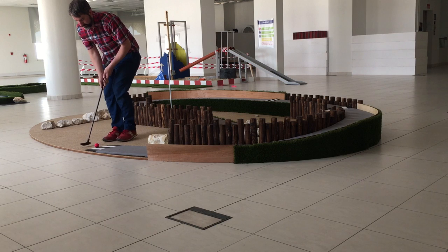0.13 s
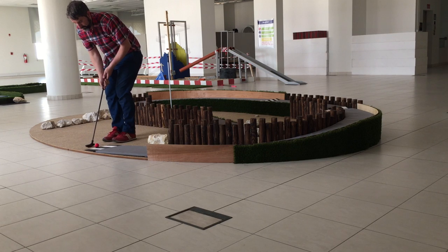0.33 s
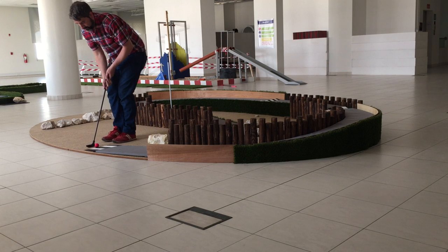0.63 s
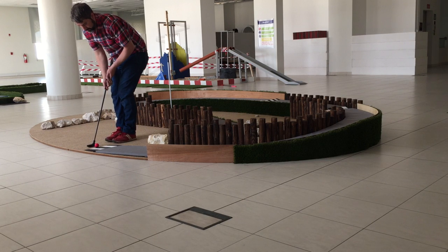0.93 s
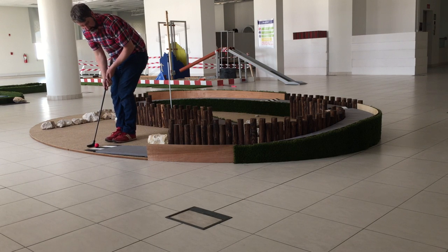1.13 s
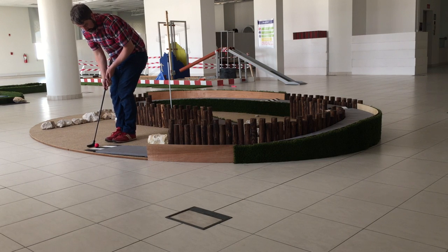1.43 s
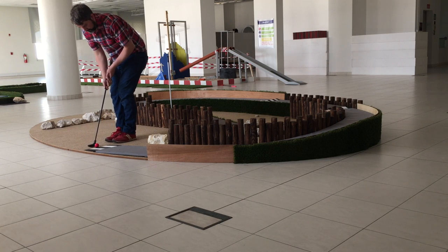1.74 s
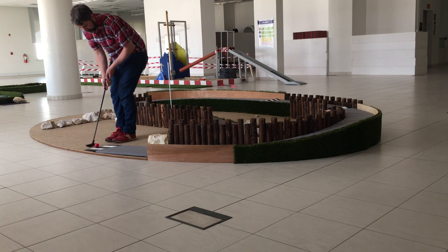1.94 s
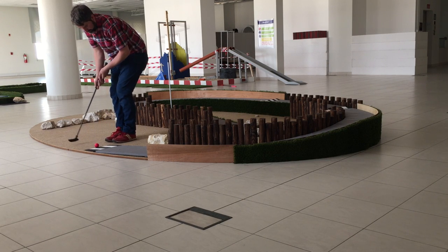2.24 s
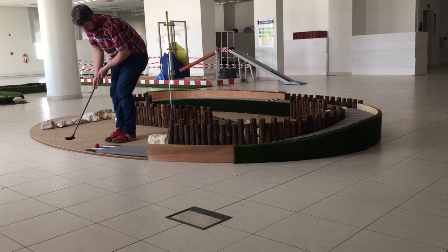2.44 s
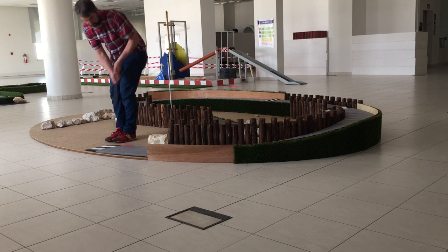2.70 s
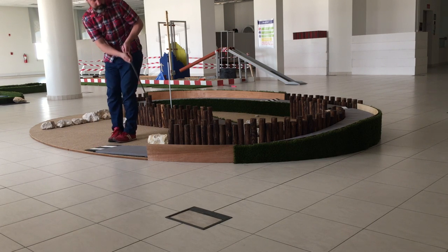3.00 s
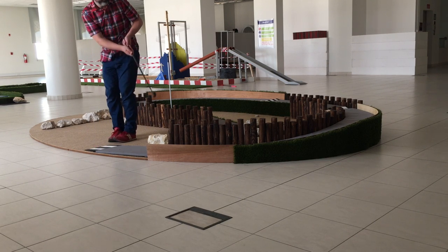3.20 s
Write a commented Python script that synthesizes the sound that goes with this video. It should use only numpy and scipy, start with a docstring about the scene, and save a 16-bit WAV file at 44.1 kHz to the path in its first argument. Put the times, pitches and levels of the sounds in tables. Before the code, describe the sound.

After a long quiet stretch of low ventilation rumble, a putter clicks a ball, which hops over hollow wood, knocks loudly on the rim and hops on, heard from some metres away in a large tiled hall.

```python
"""Putt on a hollow wooden deck

A putter clicks against a ball, which hops and rolls over a hollow wooden deck, knocks hard on the rim
and hops on. Each contact is a set of dying modes plus a pitchless crack; rolling is many tiny bumps.
A large tiled hall answers with echoes and a tail, over shaped noise for ventilation rumble and hiss."""
import sys
import numpy as np
from scipy import signal
from scipy.fft import rfft, irfft
from scipy.io import wavfile
from scipy.ndimage import uniform_filter1d

SR = 44100
rng = np.random.default_rng(int(sys.argv[2]) if len(sys.argv) > 2 else 0)


def wrap_up_sound(samples):
    """Save the sound to the file named by the first command line argument, as 16-bit audio."""
    columns = np.atleast_2d(samples).T
    # keep every value between -1 and 1, then stretch to whole-number steps
    tamed = np.clip(columns, -1, 1)
    steps = np.round(tamed * 32767).astype(np.int16)
    wavfile.write(sys.argv[1], SR, steps)


def magnitude_from_level(level_db):
    """Linear magnitude for a level in decibels (20 dB per decade)."""
    exponent = np.asarray(level_db, float) / 20
    return 10 ** exponent


N = 148176  # samples, 3.36 s

# Ringing modes of each struck thing, levels relative: pitch_hz, level_db, t60_s
PUTTER_MODES = [(473, 5.5, 0.013), (1090, 2.5, 0.005), (1330, 8, 0.0069), (1780, -5.5, 0.015),
                (3470, -5.5, 0.0084), (3630, -8.5, 0.014), (3720, -48, 0.2), (1542, -2, 0.012),
                (3340, -34, 0.61), (2390, -15.5, .01)]
DECK_MODES = [(215, -1, .035), (320, 0, .022), (430, 0, .02), (540, -3, .018), (690, 0, .02),
              (880, -2, .016), (1090, -2, .013), (1330, -3, .013), (1650, -6, .013), (2050, -8, .015),
              (2800, -8, .015), (3300, -10, .015), (3900, -10, .015)]
RIM_MODES = [(158, -4.5, 0.044), (334.6, -8, 0.051), (392, 2, 0.014), (519, 4.5, 0.0092), (735, -12, 0.03),
             (813, 2, 0.0091), (943, -1, 0.014), (1090, -9, 0.026), (1181, 4.5, 0.0069),
             (1563, 4.5, 0.0052), (1928, -9, 0.015), (2590, -9, 0.019), (3557, -10.5, 0.035),
             (4270, -8, 0.019)]
# Contacts; where and how hard they land favours some modes:
# start_s, ring_peak_db, favoured_pitch_hz, crack_db
# The putter meets the ball
PUTT_BLOWS = [(2.7043, -19.5, 2580, -29)]
# First hops on the deck, same columns
HOP_BLOWS = [(2.8253, -41.5, 2350, -41), (2.8265, -27.5, 428, -46), (2.8322, -25.5, 747, -64),
             (2.9062, -26.5, 366, -42.5), (2.9755, -30.5, 243, -44)]
# The rim rattles under the knock, same columns
KNOCK_BLOWS = [(2.9857, -10, 1110, -16.5), (2.9878, -10, 730, -10.5), (2.9925, -8.5, 330, -22),
               (2.9952, -12.5, 910, -17), (3.0001, -17, 825, -26.5), (3.0035, -23, 900, -23.5)]
# Later hops on the deck; any crack has the same colour as the rim's; same columns
LATER_HOP_BLOWS = [(3.2282, -24.5, 1340, -28), (3.2305, -22.5, 296, -28), (3.2664, -29.5, 885, -71),
                   (3.292, -33, 228, -72), (3.3003, -27.5, 1090, -36.5), (3.351, -62.5, 3930, -48)]
# Crack colour of putter, rim and later hops, relative: pitch_hz, level_db
CRACK_COLOUR = [(300, -32), (1000, 19.5), (2500, 2.5), (4500, -1.5), (7000, -8.5), (11000, -14),
                (15000, -23)]
# Crack colour of the first hops, relative: pitch_hz, level_db
HOP_CRACK_COLOUR = [(300, -31), (1500, 8), (5500, -22), (9000, -8), (15000, -14)]
# Loudness curve of the rolling ball: time_s, level_db
ROLL_LEVEL = [(2.801, -71), (2.836, -39.5), (2.9, -60), (2.972, -48.5), (3.2, -80), (3.27, -54.5),
              (3.34, -44)]
# Early echoes: delay_s, level_db
EARLY_ECHOES = [(.0095, -11), (.0175, -17), (.029, -22), (.122, -25)]
# Decay of the hall's tail: pitch_hz, t60_s
HALL_DECAY = [(100, 3.8), (300, 0.86), (1000, 1.62), (3000, 1.67), (8000, 0.58), (15000, 0.38)]
# Starting colour of the tail, relative: pitch_hz, level_db
TAIL_COLOUR = [(100, 7), (300, 11.5), (1000, 1.5), (3000, 2), (8000, 10.5), (15000, 12.5)]
# Spectrum of rumble and hiss, relative: pitch_hz, level_db (per Hz)
HUM_SPECTRUM = [(24, -46), (31, -24), (39, -16), (64, -0.5), (85, 2), (133, -9.5), (171, -11.5),
                (298, -29.5), (597, -37), (850, -38), (1230, -42), (1700, -43.5), (3000, -49),
                (4800, -53.5), (6200, -54.5), (10300, -61), (15500, -62.5)]

PUTT_OCTAVES, HOP_OCTAVES, KNOCK_OCTAVES = 5, .33, 1.3  # how wide the favoured range is
RISE_CYCLES = 1.2  # time constant of a mode's build-up, in its own cycles
CRACK_RISE_S, CRACK_T60_S = .0004, .012
PUTT_TILT_DB = 8  # towards this per octave in the treble; brightens the putter's crack
BUMPS_PER_S, BUMP_HZ, BUMP_OCTAVES = 150, 450, 1.5  # mean rate, favoured pitch and range
BUMP_SPREAD_DB = 4  # mean boost of a bump before the cap
BURST_S, BURST_LEN_S, BURST_DB, BURST_HZ = 2.968, .016, -56, (2500, 13000)  # just before the knock
HALL_DB, NEAR_DB = -11, -10.5  # long tail; quick scatter off near surfaces before dulling
NEAR_T60_S, NEAR_HZ = 0.21, 5300  # scatter's decay; near echoes lose treble above NEAR_HZ
ECHO_SMEAR_S = .003  # time constant
BLUR_HZ = 150  # rms rate at which the balance of the two tails turns
HUM_DB = -44.5  # rms
PATCH_DB, SWELL_DB = 1.1, .3
MURMUR_DB, MURMUR_HZ = 1.0, 550  # extra patchiness around this pitch
START_S, FADE_IN_S = 0.034, 0.015
EDGE_HZ = 15500


def evened(x):
    """Scales to rms 1."""
    return x / np.sqrt(np.mean(x ** 2) + 1e-20)


def read(points, hz):
    """Reads a table along a log-frequency axis."""
    f, value = np.transpose(points)
    return np.interp(np.log(hz + 1), np.log(f + 1), value)


def add(mix, s, sound):
    """Mixes a sound in at time s."""
    part = mix[round(s * SR):][:len(sound)]
    part += sound[:len(part)]


def ring(modes, favoured_hz, octaves):
    """Sums dying modes that build up with their own cycles, strongest near the favoured pitch. Peak 1."""
    t = np.arange(SR // 2) / SR
    out = np.zeros(len(t))
    for hz, db, t60 in modes:
        favour_db = -7.2 * (np.log2(hz / favoured_hz) / octaves) ** 2
        envelope = magnitude_from_level(db + favour_db - 60 * t / t60) * (1 - np.exp(-t * hz / RISE_CYCLES))
        out += envelope * np.sin(2 * np.pi * hz * t)
    return out / abs(out).max()


def crack(grit, spectrum, tilt_db):
    """A dying burst of noise held to a smooth spectrum, so that it has no pitch of its own."""
    t, hz = np.arange(2048) / SR, np.fft.rfftfreq(2048, 1 / SR)
    fade = magnitude_from_level(-60 * t / CRACK_T60_S) * (1 - np.exp(-t / CRACK_RISE_S))
    colour = magnitude_from_level(read(spectrum, hz) + tilt_db * np.log2(hz / 1000 + 1))
    burst = grit * fade
    for _ in range(12):
        # keep the phases, impose the colour, then pull it back under the envelope
        burst = irfft(colour * np.exp(1j * np.angle(rfft(burst))))
        burst = burst * np.linalg.norm(fade) / np.linalg.norm(burst)
        burst = np.clip(burst, -3 * fade, 3 * fade)
    return burst


def blows(rows, modes, octaves, spectrum, tilt_db=0):
    """Each blow sets the struck object's modes ringing and adds a crack of contact noise."""
    out = np.zeros(N)
    grits = rng.standard_normal((len(rows), 2048))
    for (s, db, favoured_hz, crack_db), grit in zip(rows, grits):
        add(out, s, magnitude_from_level(db) * ring(modes, favoured_hz, octaves))
        add(out, s, magnitude_from_level(crack_db) * crack(grit, spectrum, tilt_db))
    return out


def rolling():
    """Many small bumps of the ball, at random times and strengths, ring the deck."""
    strength = magnitude_from_level(BUMP_SPREAD_DB * np.minimum(rng.exponential(1, N), 4))
    bumps = (rng.random(N) < BUMPS_PER_S / SR) * strength * rng.choice([-1., 1.], N)
    sound = signal.oaconvolve(bumps, ring(DECK_MODES, BUMP_HZ, BUMP_OCTAVES))[:N]
    s, db = np.transpose(ROLL_LEVEL)
    level_db = np.interp(np.arange(N) / SR, s, db, left=-150)
    return magnitude_from_level(level_db) * evened(sound)


def faint_burst():
    """A brief faint burst of band-passed noise, heard as hiss just before the knock."""
    out = np.zeros(N)
    progress = np.arange(2000) / SR / BURST_LEN_S
    band = signal.butter(2, BURST_HZ, "bandpass", fs=SR, output="sos")
    hiss = evened(signal.sosfilt(band, rng.standard_normal(2000)))
    envelope = np.clip(8 * progress, 0, 1) * (progress < 1)
    add(out, BURST_S, magnitude_from_level(BURST_DB) * hiss * envelope)
    return out


def sparse_taps():
    """Two trains of random-sign reflections, one every 10 samples or so, starting after 5 ms."""
    taps = np.zeros((2, SR))
    at = np.arange(SR // 200, SR - 10, 10)
    at = at + rng.integers(0, 10, (2, len(at)))
    np.put_along_axis(taps, at, rng.choice([-1., 1.], at.shape), axis=1)
    return taps


def late_tail(x, taps):
    """Taps die band by band; a wandering balance between two tails blurs narrow rings."""
    hz, t, z = signal.stft(taps, SR, nperseg=256)
    z = z * magnitude_from_level(read(TAIL_COLOUR, hz)[:, None] - 60 * t / read(HALL_DECAY, hz)[:, None])
    tails = signal.istft(z, SR, nperseg=256)[1][:, :SR]
    tails = tails / np.linalg.norm(tails[0])
    wander = evened(uniform_filter1d(rng.standard_normal(N), size=200))
    turn = 2 * np.pi * np.cumsum(BLUR_HZ * wander) / SR
    shares = x * np.array([np.cos(turn), np.sin(turn)])
    return signal.fftconvolve(shares, tails, axes=1).sum(0)[:N]


def near_echoes(x, taps):
    """Quick scatter and smeared echoes off near surfaces, dulled by a gentle low-pass."""
    near = taps[0] * magnitude_from_level(-60 * np.arange(SR) / SR / NEAR_T60_S)
    near = magnitude_from_level(NEAR_DB) * near / np.linalg.norm(near)
    for delay, db in EARLY_ECHOES:
        rough = rng.standard_normal(300) * np.exp(-np.arange(300) / SR / ECHO_SMEAR_S)
        add(near, delay, magnitude_from_level(db) * rough / np.linalg.norm(rough))
    near = signal.lfilter(*signal.butter(1, NEAR_HZ, fs=SR), near)
    return signal.fftconvolve(x, near)[:N]


def hall(x):
    """Direct sound, near reflections and the long tail of the tiled hall."""
    taps = sparse_taps()
    return x + near_echoes(x, taps) + magnitude_from_level(HALL_DB) * late_tail(x, taps)


def hum():
    """Ventilation rumble and faint hiss: shaped noise with drifting patches and a slow swell."""
    frames, hz = N // 512 + 5, np.fft.rfftfreq(2048, 1 / SR)
    a, b, patches = rng.standard_normal((frames, 1025, 3)).T  # each: bins by frames
    patches = uniform_filter1d(patches, 20, 0)
    patches = evened(uniform_filter1d(patches, 8, 1))
    swell = evened(uniform_filter1d(rng.standard_normal(frames), 20))
    depth_db = PATCH_DB + MURMUR_DB * np.exp(-np.log2((hz + 1) / MURMUR_HZ) ** 2)
    level_db = read(HUM_SPECTRUM, hz)[:, None] + depth_db[:, None] * patches + SWELL_DB * swell
    noise = signal.istft((a + 1j * b) * magnitude_from_level(level_db), nperseg=2048, noverlap=1536)[1][:N]
    return magnitude_from_level(HUM_DB) * evened(noise)


def scene():
    """Putter, ball, deck and rim sound in the hall, over the hum."""
    putt = blows(PUTT_BLOWS, PUTTER_MODES, PUTT_OCTAVES, CRACK_COLOUR, PUTT_TILT_DB)
    hops = blows(HOP_BLOWS, DECK_MODES, HOP_OCTAVES, HOP_CRACK_COLOUR)
    knock = blows(KNOCK_BLOWS, RIM_MODES, KNOCK_OCTAVES, CRACK_COLOUR)
    later_hops = blows(LATER_HOP_BLOWS, DECK_MODES, HOP_OCTAVES, CRACK_COLOUR)
    close = putt + hops + knock + later_hops + rolling() + faint_burst()
    return (hall(close) + hum())[None]


def top_cut(x):
    """Nothing passes above the cut-off."""
    return signal.sosfilt(signal.butter(12, 15810, fs=SR, output="sos"), x)


def record(dry):
    """Fades in from silence and cuts the extreme treble with a steep low-pass."""
    fade = np.clip((np.arange(N) / SR - START_S) / FADE_IN_S, 0, 1) ** 2
    low_pass = signal.firwin(511, EDGE_HZ, window=("kaiser", 9), fs=SR)
    mix = signal.oaconvolve(dry * fade, low_pass[None], "same")
    return top_cut(mix)


dry = scene()
out = record(dry)
wrap_up_sound(out)
```